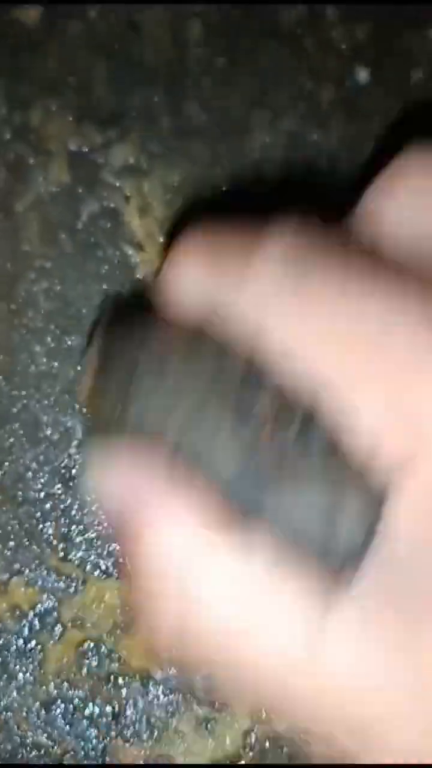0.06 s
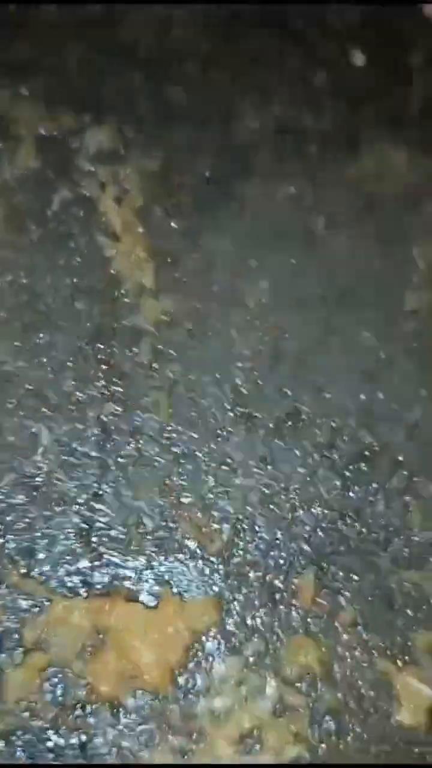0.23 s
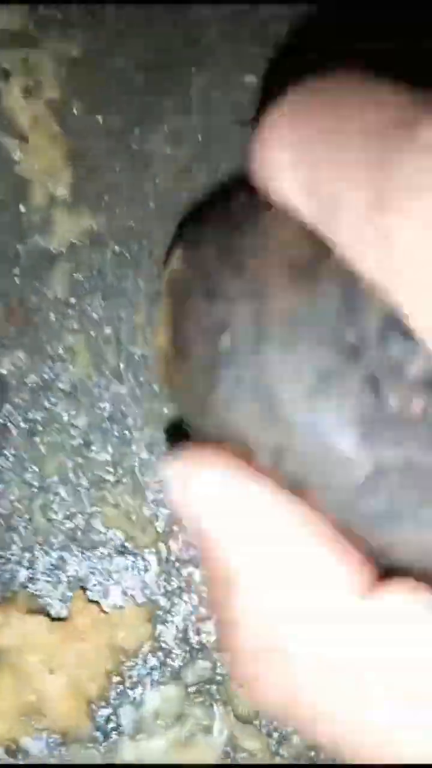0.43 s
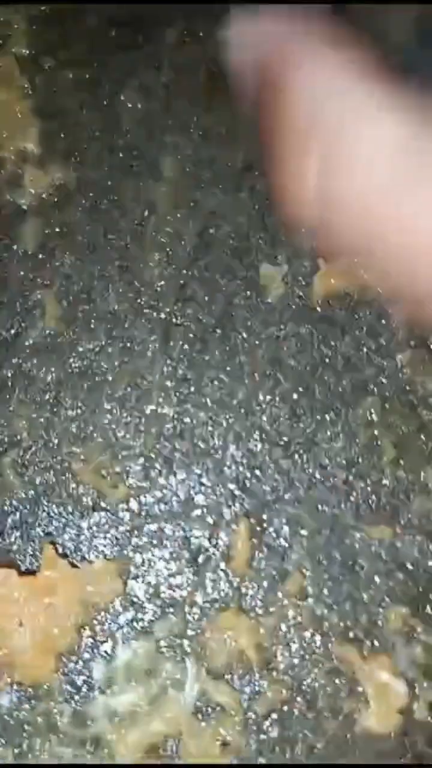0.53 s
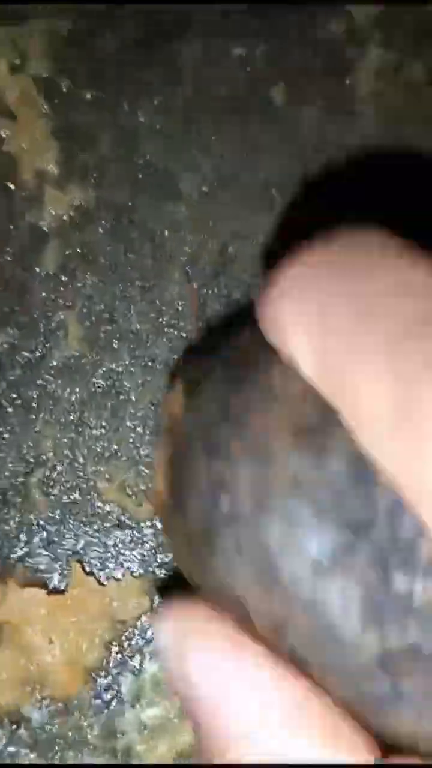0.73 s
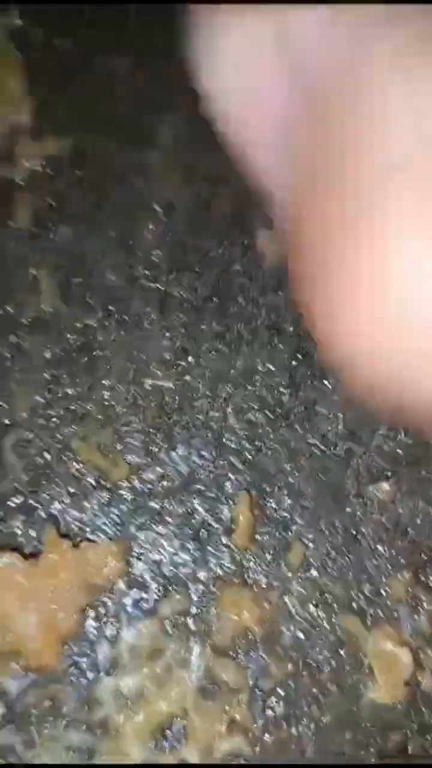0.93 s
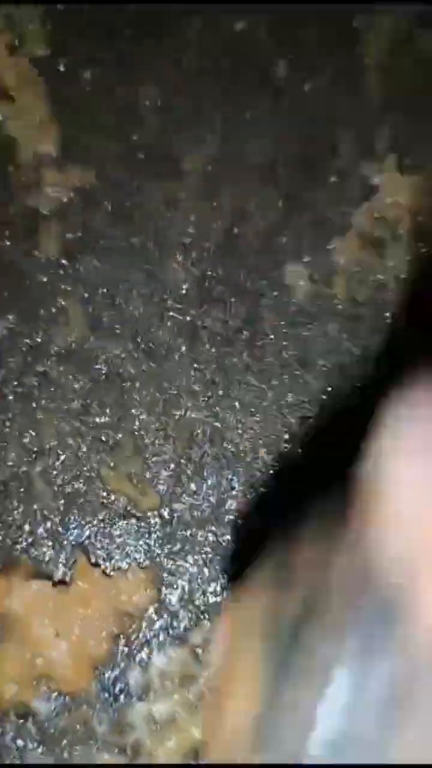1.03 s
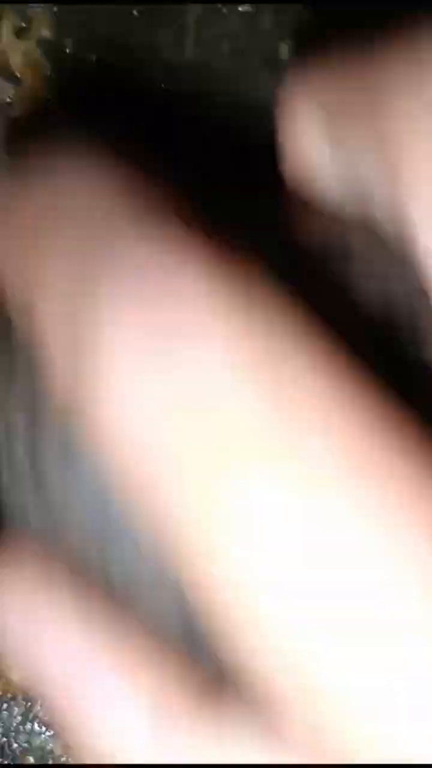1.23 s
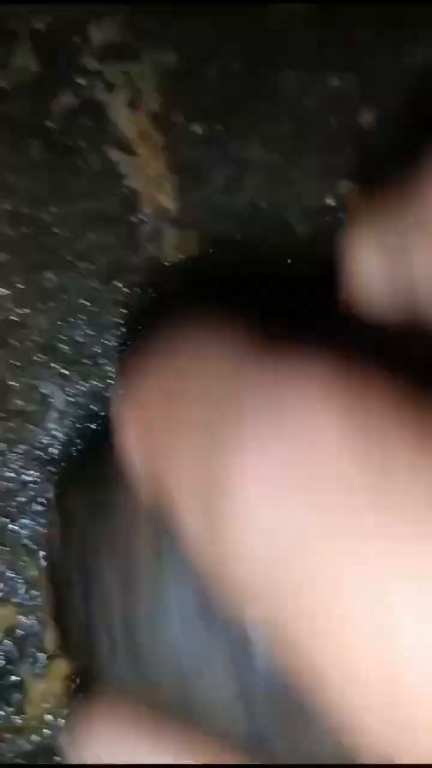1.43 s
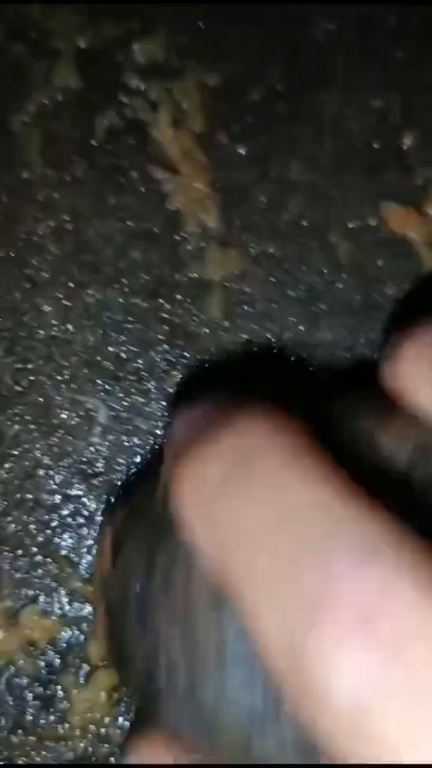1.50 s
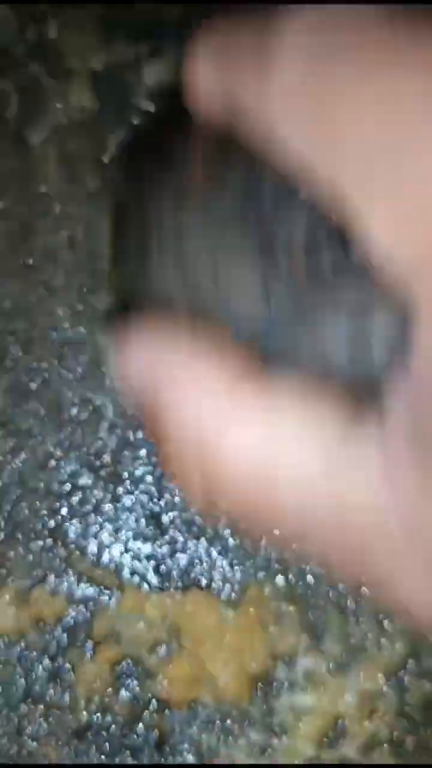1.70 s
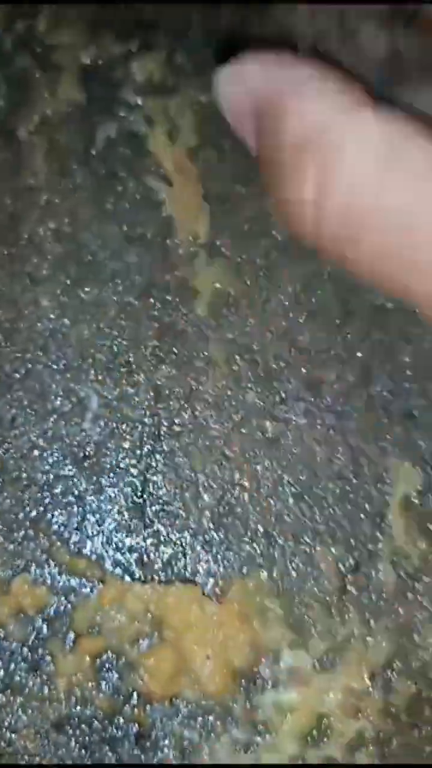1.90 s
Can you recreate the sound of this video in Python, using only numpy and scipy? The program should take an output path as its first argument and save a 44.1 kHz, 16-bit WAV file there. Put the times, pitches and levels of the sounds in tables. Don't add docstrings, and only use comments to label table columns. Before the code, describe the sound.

Close stereo capture of rough stone-on-stone scraping; after a hard clack come two bouts of rapid strokes with wet fizz and grit ticks, split by a lift and low thump, in a small quiet room.

```python
import sys
import numpy as np
from scipy import signal
from scipy.fft import rfft, irfft
from scipy.io import wavfile
from scipy.ndimage import uniform_filter1d

SR = 44100
rng = np.random.default_rng(int(sys.argv[2]) if len(sys.argv) > 2 else 0)


def transcribe(signal):
    frames = np.atleast_2d(signal).T
    limited = np.clip(frames, -1, 1)
    pcm = np.round(limited * 32767).astype(np.int16)
    wavfile.write(sys.argv[1], SR, pcm)


def undo_db(level):
    steps = np.asarray(level, float) / 20
    return 10 ** steps


N = 85995
TIME = np.arange(N) / SR
HZ = np.fft.rfftfreq(4096, 1 / SR)


def evened(x):
    return x / np.sqrt(np.mean(x ** 2) + 1e-20)


def read(points, hz, axis=1):
    p = np.transpose(points)
    return np.interp(np.log(hz + 1), np.log(p[0] + 1), p[axis])


def causal(gain):
    log_gain = np.log(np.maximum(np.r_[gain, gain[-2:0:-1]], 1e-5))
    return np.fft.ifft(np.exp(np.conj(signal.hilbert(log_gain)))).real[:2048]


def ring(x, gains):
    return np.array([signal.oaconvolve(v, causal(g))[:N] for v, g in zip(x, gains)])


def bell(hz, width_hz):
    return 1 / (1 + (2 * (HZ - hz) / width_hz) ** 2) ** 2


def wander(seconds, count=2):
    width = max(round(seconds * SR), 2)
    once = uniform_filter1d(rng.standard_normal((count, N)), width, 1)
    return evened(uniform_filter1d(once, width, 1))


def slips(rate_per_s, spread_db):
    size = undo_db(spread_db * np.minimum(rng.exponential(1, (3, N)), 5))
    size *= rng.random((3, N)) < rate_per_s / SR
    size *= rng.choice([-1., 1.], size.shape)
    likeness = .85
    return likeness * size[0] + np.sqrt(1 - likeness ** 2) * size[1:]


# (start [s], length [s], pressure [dB], fizz [dB], rumble [dB])
STROKE_TABLE = [
    (-.13, 0.15, -28.5, -25, -17.5),
    (0.229, 0.16, -24.5, -27, -14),
    (0.4, 0.15, -28, -22, -14),
    (0.543, 0.14, -23, -23.5, -17),
    (0.689, 0.13, -28, -26.5, -10.5),
    (1.097, 0.17, -24, -23.5, -11),
    (1.321, 0.12, -27.5, -21, -15),
    (1.439, 0.16, -26, -20.5, -11),
    (1.604, 0.14, -29, -20.5, -17.5),
    (1.742, 0.1, -31, -15, -9),
]
COARSENESS = [2.5, -10, 4, 10, 7.5, 5.5, 9, 9.5, 5, -1.]


def motion():
    rise, fall = 0.45, 0.36
    turn_db = -20
    scrape, fizz, rumble, grit = np.zeros((4, N))
    for (start, length, db, fizz_db, rumble_db), grit_db in zip(STROKE_TABLE, COARSENESS):
        u = np.clip((TIME - start) / length, 0, 1)
        ramp = np.minimum(np.minimum(u / rise, (1 - u) / fall), 1)
        speed = np.sin(np.pi / 2 * ramp) ** 2 * (0.55 + 0.2 * np.sin(np.pi * u))
        drag = undo_db(turn_db) * uniform_filter1d(((u > 0) & (u < 1)) * 1., 900)
        from_middle = (TIME - start - 0.5 * length) / (0.51 * length)
        scrape += undo_db(db) * (speed + drag)
        fizz += undo_db(db + fizz_db) * (speed ** 1.27 + drag)
        rumble += undo_db(db + rumble_db) * np.exp(-from_middle ** 2)
        grit += undo_db(db + grit_db) * (speed + drag)
    return scrape, fizz, rumble, grit


BREAK_AWAYS = [.330, .635, 1.176, 1.377, 1.524, 1.689]


def sticking():
    hold_s, hold_db = .007, -9
    ahead = (np.reshape(BREAK_AWAYS, (-1, 1)) - TIME) / hold_s
    return undo_db(hold_db * (np.exp(-ahead ** 2) * (ahead > 0)).sum(0))


# (frequency [Hz], width [Hz], left [dB], right [dB])
STONE_MODES = [(557.8, 15.7, 2.5, -5), (670, 211, 3.5, -6), (793.4, 150, 5.5, 0.5), (1050, 40, -4, -12.5),
               (1435, 320, -3, -12.5), (1692, 690, -1.5, -32), (2123, 327, 0.5, 6), (2386, 72, 1, -42),
               (2600, 150, -10, -25), (4210, 60, -32, -8.5), (6070, 1600, -24, -39.5)]
# (frequency [Hz], left [dB], right [dB])
STONE_SKIRT = [(217, -66, -16), (486, -5, -14.5), (1190, -4, -12.5), (3200, -11.5, -17.5),
               (5000, -22, -15.5), (9000, -78.5, -102.5), (15900, -49, -77.5)]


def stone(shift_db=0):
    hz, width, left, right = np.transpose(STONE_MODES)[:, :, None]
    shift_db = np.reshape(shift_db, (-1, 1))
    gains = []
    for axis, db in ((1, left), (2, right)):
        modes = bell(hz, width) * undo_db(db + shift_db) ** 2
        gains.append(np.sqrt(modes.sum(0) + undo_db(read(STONE_SKIRT, HZ, axis)) ** 2))
    return gains


# (time [s], level [dB], brightness [dB])
CATCH_TABLE = [(0.277, -20, -6), (.294, -12, -7), (.305, -8, 0.5), (0.331, -1, 5.5), (.447, -31, 4),
               (.487, -17, -10), (.566, -6, 1), (0.578, -15, -12), (0.59, -6, 4.5), (0.619, -13, 9),
               (0.636, -23.5, 24), (.651, -16, 17.5), (.731, -19.5, 11), (.773, -11, -6),
               (1.107, -23.5, 14), (1.141, -35, -1), (1.160, -27.5, -19.5), (1.1775, -6, 5.5),
               (1.187, -8.5, 12), (1.199, -20, 20), (1.225, -8, -6.5), (1.349, -15, 3), (1.354, -8.5, 1.5),
               (1.370, -26, -7), (1.378, -4, 1), (1.387, -21, 18), (1.398, -22, -12), (1.409, -11, 4),
               (1.484, -16, 12), (1.525, -5, -4), (1.540, -24, -4), (1.553, -15.5, -12), (1.634, -31, 17),
               (1.678, -25, -1), (1.69, -4.5, 1.5), (1.772, -22.5, -1), (1.828, -18, -2)]
# (frequency [Hz], width [Hz], level [dB])
RASP_BANDS = [
    (2706, 555, -5.5),
    (3890, 1300, -9.5),
    (4550, 1300, -24),
]


def clicks(rows):
    out = np.zeros(N)
    for s, db in rows:
        out[round(s * SR)] += undo_db(db)
    return out


def grind(scrape, grit):
    slips_per_s, spread_db, spot_db = 2500, 0.5, -1.5
    catch_db, catch_rise_s = -11, 0.00026
    press = undo_db(2.2 * wander(.004, count=4) + .9 * wander(.003, count=1))
    spots = np.zeros((2, N))
    for p in press:
        force = slips(slips_per_s / 4, spread_db) * scrape * p
        spots += ring(force, stone(spot_db * rng.standard_normal(len(STONE_MODES))))
    spots *= np.sqrt(np.mean(scrape ** 2) / np.mean(spots ** 2))

    blow = np.exp(-(np.arange(-30, 31) / SR / catch_rise_s) ** 2 * 4)
    peak = abs(np.convolve(causal(stone()[1]), blow)).max()
    for side in (-1, 1):
        rows = [(s, db + catch_db + side * bright_db) for s, db, bright_db in CATCH_TABLE]
        hits = np.convolve(clicks(rows), blow, "same")
        share = 1 / (1 + ((HZ + 1) / 1300) ** (-4 * side))
        spots = spots + ring([hits, hits], [g * share for g in stone()]) / peak

    rasp = np.zeros((2, N))
    for (hz, width, db), drift in zip(RASP_BANDS, wander(0.052, count=3)):
        force = evened(slips(2500, 5.5)) * grit * undo_db(db + 2 * drift)
        rasp += ring(force, [bell(hz, width)] * 2)
    return spots + rasp * undo_db([[-2], [2]])


def patchy(x):
    hz, t, z = signal.stft(x, SR, nperseg=256, noverlap=192)
    field = rng.standard_normal((len(t), len(hz))).T
    field = evened(uniform_filter1d(uniform_filter1d(field, size=6, axis=0), size=24, axis=1))
    depth = np.clip(hz / 2500 - .5, .3, 1)[:, None]
    return signal.istft(z * undo_db(3 * depth * field), SR, nperseg=256, noverlap=192)[1][:, :N]


def resonate(x, hz, width_hz):
    turn = np.exp(2j * np.pi * np.cumsum(hz) / SR)
    r = np.exp(-np.pi * width_hz / SR)
    return evened((turn * signal.lfilter([1], np.convolve([1, -r], [1, -r]), x / turn)).real)


# (time [s], scrape [Hz], hum [Hz], scrape [dB], hum [dB])
CONTACT_TABLE = [(.25, 2270, 731, -12.5, -8), (0.369, 1900, 750, -3, -10), (0.449, 2600, 1040, -13, -12.5),
                 (.57, 1860, 974, -12, -11), (.66, 2390, 1050, -8, -15), (0.801, 2230, 706, -11.5, -13.5),
                 (1.105, 2377, 592, 2.5, 0), (1.169, 2530, 591, -10.5, -4), (1.208, 2830, 632, -7, -6.5),
                 (1.26, 2370, 630, -10.5, -16), (1.36, 1850, 760, -6.5, -10.5),
                 (1.53, 2483, 703, -12.5, -12.5), (1.84, 2190, 838, -8, -9.5)]


def rolling(scrape):
    s, *columns = np.transpose(CONTACT_TABLE)
    high_hz, low_hz, high_db, low_db = (np.interp(TIME, s, c) for c in columns)
    high = resonate(slips(1500, 2.92), high_hz, 327) * undo_db(high_db + np.array([[-2.5], [2.5]]))
    low = resonate(slips(800, 2.87), low_hz, 153) * undo_db(low_db + np.array([[3.5], [-4.5]]))
    return scrape * (high + low)


# (frequency [Hz], length [s], left [dB], right [dB])
KNOCK_MODES = [(2188, 0.0015, 0.5, 15), (1700, 0.0017, -0.5, -8), (718, 0.0021, -7.5, -8.5),
               (1300, 0.0026, -14, -21), (4500, 0.0006, -5, -22.5), (2810, 0.00064, -10, -14.5)]


def knock():
    knock_s, graze_ahead_s, graze_db = .2236, .0008, -32
    t = np.maximum(TIME - knock_s, 0)
    attack = np.minimum(t / 0.00037, 1)
    blow = np.zeros((2, N))
    for hz, length, left, right in KNOCK_MODES:
        blow += undo_db([[left], [right]]) * np.sin(2 * np.pi * hz * t) * np.exp(-(t / length) ** 2) * attack
    return blow + undo_db(graze_db) * np.roll(blow, -round(graze_ahead_s * SR), 1) * (t == 0)


# (time [s], level [dB], depth [dB])
SNAP_TABLE = [(1.0771, -36.5, -4), (0.4267, -44, 4), (0.4354, -38, 5), (0.4505, -40, 3.5), (0.4687, -39, 0),
              (0.7023, -48, -4), (0.7495, -46, 22), (1.0786, -23, 0), (1.1173, -37.5, 14.5),
              (1.2239, -33.5, 16), (1.4077, -54, -21), (1.4378, -41, 1), (1.477, -41.5, -8.5),
              (1.498, -26.5, -30), (1.632, -58, 23), (1.676, -40, -1), (1.707, -36.5, 4), (1.7818, -44, 6),
              (1.8275, -36, -7)]
# (frequency [Hz], left [dB], right [dB])
FIZZ_COLOUR = [(2000, -14, -16.5), (4500, 0, 0.5), (7000, -12, -3), (9400, -7, -27.5), (12500, -0.5, -19.5),
               (16500, -11.5, -24.5)]


def paste(fizz):
    clump_db, rustle_db, rustle_s = -2.5, -6.5, 0.056
    snap_s, snap_rise_s, snap_db = 0.0062, 0.0022, -0.5
    pole = 1 / (rustle_s * SR)
    linger = signal.lfilter([pole], [1, pole - 1], fizz)
    wet = evened(slips(7400, 1.4)) * fizz * undo_db(clump_db * wander(0.002, count=1))
    wet += undo_db(rustle_db) * linger * rng.standard_normal((2, N))
    deep = np.zeros((2, N))
    t = np.arange(1300) / SR
    for s, db, low_db in SNAP_TABLE:
        a, b, crackle = rng.standard_normal((3, len(t)))
        burst = np.array([a, .6 * a + .8 * b]) * undo_db(4. * evened(uniform_filter1d(crackle, 30)))
        burst *= np.exp(-t / snap_s) * np.minimum(t / snap_rise_s, 1) * undo_db(db + snap_db)
        first = round(s * SR) - 40
        wet[:, first:][:, :len(t)] += burst
        deep[:, first:][:, :len(t)] += burst * undo_db(min(low_db, 6))
    gains = [undo_db(read(FIZZ_COLOUR, HZ, axis=k)) * (HZ > 800) for k in (1, 2)]
    deep_gain = 1 / (1 + ((HZ - 4500) / 1500) ** 4)
    return ring(wet, gains) * undo_db(7.5) + ring(deep, [deep_gain] * 2)


# (frequency [Hz], level [dB])
COUNTER_COLOUR = [(40, -34.5), (60, -11.5), (82, 4.5), (100, 1), (120, -2.5), (200, -6), (300, -18.5),
                  (500, -46.5)]
# (frequency [Hz], level [dB], T60 [s])
THUD_MODES = [
    (83.6, -8.5, 0.45),
    (146, 2, 0.055),
    (208, -37, 0.05),
]


def counter(rumble):
    thud_s, thud_db = 1.0876, -16
    touch_s, touch_hz, touch_db, touch_t60 = 1.082, 550, -29, .02
    a, b = rng.standard_normal((2, N))
    gain = undo_db(read(COUNTER_COLOUR, HZ) - 19 * np.log2(np.maximum(HZ / 500, 1)))
    low = ring([a * rumble, (a + 0.26 * b) * rumble], [gain, gain])
    low *= np.sqrt(np.mean(rumble ** 2) / np.mean(low ** 2))

    t = np.maximum(TIME - thud_s, 0)
    thud = np.zeros(N)
    for hz, db, t60 in THUD_MODES:
        thud -= undo_db(thud_db + db - 60 * t / t60) * np.sin(2 * np.pi * hz * t)
    u = np.maximum(TIME - touch_s, 0)
    touch = undo_db(touch_db - 60 * u / touch_t60) * np.sin(2 * np.pi * touch_hz * u)
    return low + undo_db([[.5], [-.5]]) * (thud * np.minimum(t / 0.0035, 1) + touch)


# (time [s], level [dB], centre [Hz])
TICK_TABLE = [(.315, -38.5, 5000), (0.45, -40, 13100), (0.4672, -23, 4600), (.478, -38, 12000),
              (.515, -34, 11900), (.567, -32.5, 3830), (0.627, -29, 7000), (0.721, -39, 12100),
              (0.756, -24, 4500), (1.125, -27, 3470), (1.14, -33, 4000), (1.335, -31.5, 4500),
              (1.381, -43, 7000), (1.408, -37, 13000), (1.433, -42, 11000), (1.452, -40, 9000),
              (1.492, -27, 8100), (1.497, -28, 13000), (1.537, -28, 13000), (1.635, -35, 5000),
              (1.783, -25.5, 10000), (1.827, -32, 9000)]


def ticks():
    decay_s, octaves = .0009, .9
    t = np.arange(256) / SR
    hz = np.fft.rfftfreq(256, 1 / SR) + 1
    out = np.zeros((2, N))
    for s, db, centre_hz in TICK_TABLE:
        a, b = rng.standard_normal((2, 256)) * np.exp(-t / decay_s)
        colour = np.exp(-(np.log2(hz / centre_hz) / octaves) ** 2)
        burst = irfft(rfft([a, 0.3 * a + 0.53 * b]) * colour)
        out[:, round(s * SR):][:, :256] += undo_db(db) * burst / abs(burst).max()
    return out


# (start [s], length [s], level [dB])
LIFT_TABLE = [
    (0.787, 0.45, -62.5),
    (1.257, 0.14, -66),
    (1.811, 0.11, -55),
]
# (frequency [Hz], level [dB])
LIFT_COLOUR = [(290, -50), (500, -17), (1480, 13), (2940, 10.5), (3660, 9), (4760, -24), (14900, -10),
               (16500, -33)]


def lifts():
    level = np.zeros(N)
    for s, length, db in LIFT_TABLE:
        level += undo_db(db) * np.sin(np.pi * np.clip((TIME - s) / length, 0, 1)) ** .5
    gain = undo_db(read(LIFT_COLOUR, HZ)) * (HZ > 250)
    return level * evened(ring(rng.standard_normal((2, N)), [gain, gain])) * undo_db([[-2.5], [2.5]])


def room(x):
    t60 = .2
    t = np.arange(SR // 2) / SR
    tail = uniform_filter1d(rng.standard_normal((2, len(t))), size=5, axis=1)
    tail = tail * undo_db(-60 * t / t60) * np.minimum(t / 0.0057, 1)
    return signal.fftconvolve(np.tanh(x), tail / np.linalg.norm(tail[0]), axes=1)[:, :N]


# (frequency [Hz], level [dB])
AIR_COLOUR = [(24, -29), (45, -17.5), (92, -5.5), (259, -24), (349, -15), (538, -34.5), (2040, -31.5),
              (14500, -55.5), (16500, -49)]
# (frequency [Hz], likeness [-1 to 1])
AIR_LIKENESS = [(60, 0.78), (240, 0.65), (950, -0.02), (3770, 0.3), (15000, 0.67)]
# (frequency [Hz], left minus right [dB])
AIR_BALANCE = [(60, 5), (240, -3.5), (950, 2), (3770, -6.5), (15000, 12.5)]


def air():
    frames, hz = N // 256 + 5, np.fft.rfftfreq(1024, 1 / SR)
    a, b, c, d, patches = rng.standard_normal((frames, 513, 5)).T
    patches = evened(uniform_filter1d(uniform_filter1d(patches, 12, 0), 10, 1))
    same = np.clip(read(AIR_LIKENESS, hz), -1, 1)[:, None]
    left = a + 1j * b
    right = same * left + np.sqrt(1 - same ** 2) * (c + 1j * d)
    pan = read(AIR_BALANCE, hz)[:, None] / 2
    z = np.array([left * undo_db(pan), right / undo_db(pan)])
    z *= undo_db(read(AIR_COLOUR, hz)[:, None] + 0.5 * patches)
    return undo_db(-54) * evened(signal.istft(z, nperseg=1024, noverlap=768)[1][:, :N])


def scene():
    scrape, fizz, rumble, grit = motion()
    scrape = scrape * sticking()
    near = patchy(grind(scrape, grit) + paste(fizz) + lifts())
    mix = near + undo_db(-20) * room(near + knock() / 2) + counter(rumble)
    left_lag = -4
    ports = np.array([np.roll(mix[0], left_lag), mix[1]])
    return ports + knock() + air() + ticks() + rolling(scrape)


def roll_off(x):
    return signal.sosfilt(signal.butter(12, 17140, fs=SR, output="sos"), x)


def record(dry):
    low_cut = signal.butter(4, 55.4, "high", fs=SR, output="sos")
    clipped = np.clip(signal.sosfilt(low_cut, dry), -.91, .91)
    band_limit = signal.firwin(255, 16700, window=("kaiser", 9), fs=SR)
    return roll_off(signal.oaconvolve(clipped, band_limit[None], "same"))


dry = scene()
out = record(dry)
transcribe(out)
```